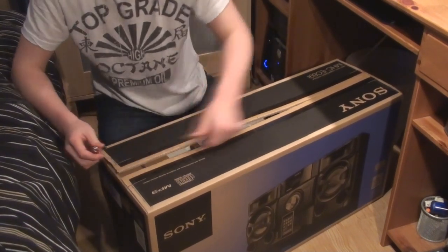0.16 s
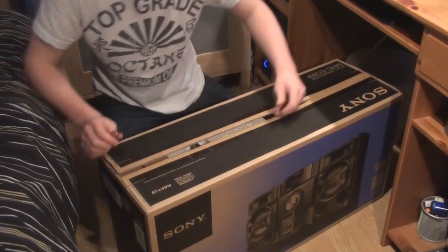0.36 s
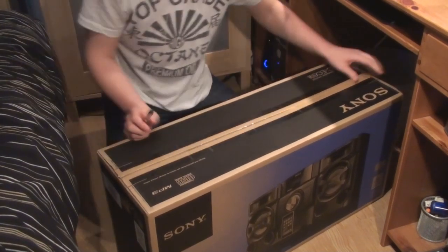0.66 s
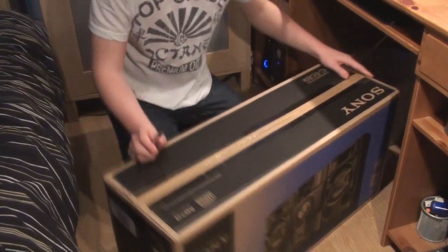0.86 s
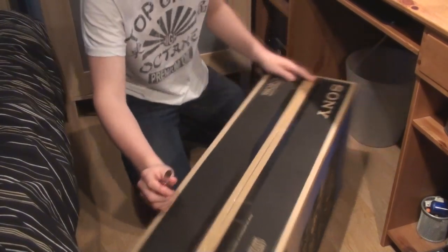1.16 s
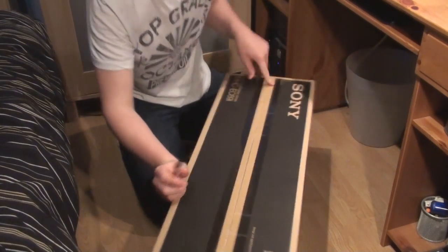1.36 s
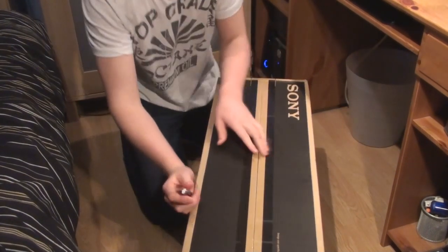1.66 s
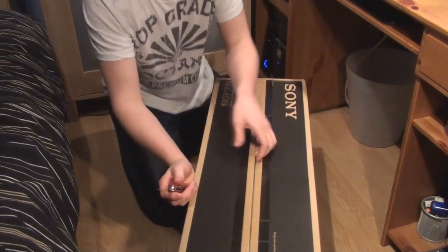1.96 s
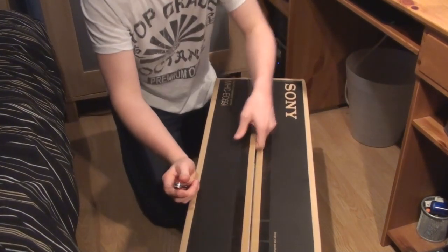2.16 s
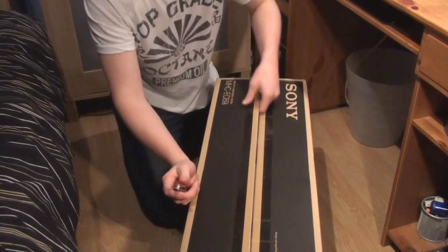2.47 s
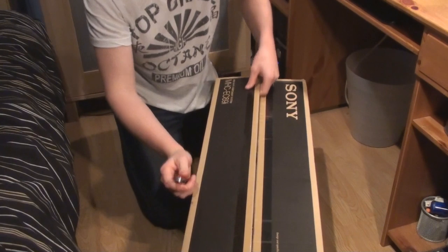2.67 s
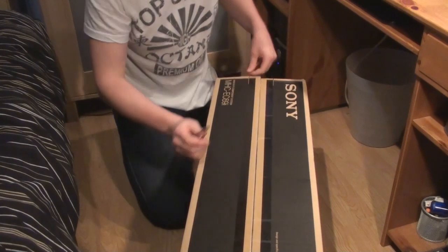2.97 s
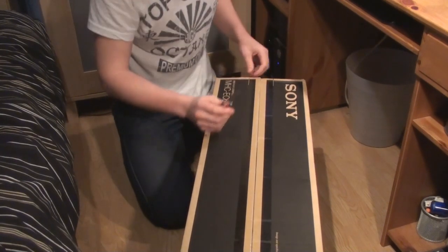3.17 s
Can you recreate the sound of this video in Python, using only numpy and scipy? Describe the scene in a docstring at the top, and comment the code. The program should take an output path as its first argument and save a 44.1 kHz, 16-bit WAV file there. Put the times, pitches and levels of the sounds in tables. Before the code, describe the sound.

Packing tape tears open on a cardboard box. First a hand sweeps the lid and the box slides round on the floor; then the tape rasps and snaps, and a flap knocks free. A small, quiet room, microphone a little way off.

```python
"""A small, quiet room, a taped cardboard box on the floor straight ahead of a stereo microphone, far
enough off that the reflections are about as strong as the direct sound. A hand sweeps over the ribbed
lid and the box is swivelled on the floor, both a hiss of tiny slips. Then the tape along the seam rasps
and snaps apart, its end gives way, and a flap lets go with a knock that rings the hollow box."""
import sys
import numpy as np
from scipy import signal
from scipy.fft import rfft, irfft
from scipy.io import wavfile
from scipy.ndimage import uniform_filter1d

SR = 44100
rng = np.random.default_rng(int(sys.argv[2]) if len(sys.argv) > 2 else 0)


def pcm_store(signal):
    """Save signal as 16-bit PCM."""
    levels = np.round(np.clip(np.atleast_2d(signal), -1, 1) * 32767)
    wavfile.write(sys.argv[1], SR, levels.astype(np.int16).T)


N = 145530

# the room's hum and hiss (frequency [Hz], level [dB])
ROOM_TONE_COLOUR = [(25, -11), (70, -2), (120, 6.5), (250, -2.5), (1000, -4.5), (4500, -11), (11000, -15.5),
                    (16000, -20)]
# stereo width of the reflections (frequency [Hz], side level [dB])
REFLECTION_WIDTH = [(60, -20), (150, -18.5), (400, -9), (1200, -6.5), (5000, -6), (10500, -3.5),
                    (12000, -14), (16000, -76)]
# hand sweeping the lid (time [s], level [dB])
SWEEP_LEVELS = [(.08, -57), (.125, -43), (.26, -41.5), (.4, -44), (.49, -47), (.57, -42.5), (.594, -27.5),
                (.622, -42), (.66, -39), (.72, -43.5), (.77, -44), (.89, -43), (.95, -46)]
# fingers crossing the corrugations (time [s], rib rate [Hz], level [dB])
RIB_RUN = [(0.149, 103, -71), (0.209, 141.3, -52), (0.257, 177.4, -43.5), (0.319, 186.2, -49.5),
           (.352, 213.3, -45.5), (0.41, 223, -47.5), (0.45, 162.3, -51), (.54, 129, -54)]
# box sliding round on the floor (time [s], level [dB])
SWIVEL_LEVELS = [(.88, -42.5), (.93, -41.5), (1.08, -36.5), (1.21, -39.5), (1.46, -40.5), (1.535, -39),
                 (1.59, -45.5), (1.76, -45), (1.88, -51.5), (1.95, -60)]
# fingers brushing off the flap (time [s], level [dB])
BRUSH_LEVELS = [(2.95, -28.5), (3.03, -39.5), (3.09, -36), (3.14, -37.5), (3.17, -71), (3.23, -80)]
# short gritty bursts of cardboard, tape and flap (time [s], level [dB], centre [Hz], decay [s])
GRIT_BURSTS = [(0.7892, -33, 3330, 0.0021), (0.809, -33, 2550, 0.0083), (1.173, -29.5, 4200, 0.11),
               (1.335, -35, 2640, 0.012), (1.99, -47.5, 1460, 0.017), (2.089, -25.5, 4260, .02),
               (2.6987, -21.5, 3060, 0.0039), (2.835, -42, 2490, .035), (2.9493, -29, 2500, 0.016)]
# the box's resonances (frequency [Hz], level [dB])
BOX_MODES = [(128, 9), (184, -3), (215, -0.5), (265, 7), (490, -2.5), (610, 9), (805, -1), (870, -4.5),
             (1630, 6.5), (2400, -19)]
# blows to the box (time [s], crunch level [dB], brightness [Hz], buckling decay [s], low cut [Hz],
# panel pitch [Hz], panel level [dB])
BOX_BLOWS = [(0.5014, -35.5, 2320, 0.037, 600, 420, -40), (.595, -37, 800, 0.025, 119, 500, -37.5),
             (0.907, -32.5, 410, 0.011, 198, 198.5, -32.5), (0.911, -32, 603, 0.01, 453, 483, -32.5),
             (1.488, -33.5, 540, 0.054, 64.5, 150, -40.5), (2.088, -40, 298, 0.074, 35.4, 412, -45.5),
             (2.208, -40, 220, 0.18, 70, 183, -43.5), (2.396, -32.5, 1400, 0.01, 513, 760, -32),
             (2.698, -24, 920, 0.0058, 514, 918, -22.5), (2.706, -27.5, 404, 0.015, 198, 499, -30),
             (2.9492, -18.5, 4270, 0.0028, 277, 1740, -35), (2.951, -23, 484, 0.0078, 340, 211, -26),
             (2.977, -33.5, 1100, 0.0054, 220, 417, -27), (3.135, -44.5, 170, 0.036, 119, 137, -39)]
# tape rasping along the seam (time [s], level [dB])
TEAR_LEVELS = [(2.04, -55), (2.072, -37.5), (2.088, -29), (2.108, -26.5), (2.125, -44), (2.165, -31),
               (2.18, -33.5), (2.2, -26.5), (2.225, -41), (2.25, -44.5), (2.305, -37.5), (2.34, -27),
               (2.375, -28.5), (2.394, -22.5), (2.415, -27.5), (2.452, -23), (2.495, -27.5), (2.535, -36.5),
               (2.555, -27.5), (2.585, -41.5), (2.61, -27.5), (2.66, -33.5), (2.682, -20.5), (2.715, -25.5),
               (2.75, -40), (2.79, -64), (2.93, -46.5), (2.95, -39)]
# tape snapping (time [s], level [dB], centre [Hz])
TAPE_SNAPS = [(0.4993, -26.5, 6440), (.5093, -30.5, 5760), (1.4805, -33, 4100), (1.9686, -45, 9000),
              (2.045, -42.5, 9400), (2.085, -29.5, 4730), (2.174, -32, 3070), (2.205, -23, 6540),
              (2.2135, -43, 5740), (2.317, -30.5, 2730), (2.332, -25, 8650), (2.381, -29.5, 4600),
              (2.389, -22.5, 5800), (2.437, -30, 5000), (2.5433, -26.5, 6200), (2.549, -27, 4500),
              (2.597, -21, 6500), (2.6713, -25, 5440)]
# tone colour of each source (frequency [Hz], level [dB])
SWEEP_SPECTRUM = [(60, -5), (250, -8.5), (550, -1), (1000, -4), (2200, -3), (4500, -0.5), (8000, -1),
                  (12000, -3), (16000, -15)]
SWIVEL_SPECTRUM = [(50, -47), (200, -5.5), (430, -2), (800, -0.5), (1500, -1), (3400, -1), (7000, -3),
                   (12000, -4), (16000, -16)]
BRUSH_SPECTRUM = [(80, -5), (300, 3), (600, 2), (2000, -3), (4000, 2), (11000, -5), (16000, -17)]
KNOCK_SPECTRUM = [(30, -3), (100, -6), (220, 0.5), (400, -0.5), (800, -2), (1200, -3.5), (1700, 1),
                  (2700, -1), (4500, -10), (8000, -1), (12000, -2), (16000, 3)]
TEAR_SPECTRUM = [(40, -36), (130, -21.5), (220, -2.5), (400, -5), (790, -1), (1300, -8.5), (1700, 2.5),
                 (2270, -3.5), (4700, 0.5), (8000, -4.5), (12800, -5), (16000, -28)]
SNAP_SPECTRUM = [(200, -22), (800, 18.5), (1700, 9), (2500, 2), (4500, 4), (8000, -2), (11500, 3),
                 (15000, -6)]

TAIL_DB, EARLY_DB = -2, -3  # reflections against the direct sound


def undb(db):
    """Decibels to gain."""
    return 10 ** (np.asarray(db) / 20)


def unit(x):
    """Scale to rms 1."""
    return x / np.sqrt(np.mean(x ** 2) + 1e-20)


def norm(x):
    """Scale to energy 1."""
    return x / np.sqrt(np.sum(x ** 2) + 1e-20)


def on_log(hz, table):
    """Read a table on a log-frequency axis."""
    freqs, values = np.array(table, float).T
    return np.interp(np.log(np.maximum(hz, 1)), np.log(freqs), values)


def fade(table):
    """Gain from rows (time [s], ..., level [dB]), silent outside them."""
    rows = np.array(table)
    return undb(np.interp(np.arange(N) / SR, rows[:, 0], rows[:, -1], left=-np.inf, right=-np.inf))


def colour(x, spectrum, size=4096):
    """Minimum-phase filter shaped by rows (frequency [Hz], level [dB])."""
    gain = undb(on_log(np.fft.rfftfreq(size, 1 / SR), spectrum))
    cepstrum = irfft(np.log(gain))
    cepstrum[1:size // 2] *= 2
    cepstrum[size // 2 + 1:] = 0
    return signal.fftconvolve(x, irfft(np.exp(rfft(cepstrum))))[:len(x)]


def cut(x, hz, kind, order=2):
    """Low-, high- or band-pass."""
    return signal.sosfilt(signal.butter(order, hz, kind, fs=SR, output="sos"), x)


def add(out, start_s, x):
    """Mix x in at the given time."""
    i = int(start_s * SR)
    out[i:i + len(x)] += x[:N - i]


def burst(x, db, span_s=.014):
    """Give a short event the energy of a steady level db held for span_s."""
    return norm(x) * undb(db) * np.sqrt(span_s * SR)


def grains(per_s, spread_db, size=N):
    """Tiny impulses at random moments, a few much stronger than the rest."""
    strength = np.minimum(rng.exponential(size=size), 4)
    happens = rng.random(size) < per_s / SR
    return unit(happens * rng.choice([-1, 1], size) * undb(spread_db * strength))


def wander(hz):
    """Smooth random drift with rms 1."""
    hold = int(SR / hz)
    steps = rng.standard_normal(N)[np.arange(N) // hold]
    return unit(uniform_filter1d(steps, hold))


def friction(levels, spectrum, slips_per_s, spread_db, catch_hz, catch_db):
    """Dense slips that come in bunches as the surface catches."""
    slips = grains(slips_per_s, spread_db) * undb(catch_db * wander(catch_hz))
    return unit(colour(slips, spectrum)) * fade(levels)


def room_tone(db=-55.5):
    """Faint, steady hum and hiss behind everything."""
    return undb(db) * unit(colour(rng.standard_normal(N), ROOM_TONE_COLOUR))


def reflections(t60_s=.29, treble_t60_s=.28, treble_hz=6500, early_decay_s=.016, gap_s=.003):
    """Close echoes from the furniture, then a short tail whose treble dies slightly sooner."""
    t = np.arange(int(.32 * SR)) / SR
    noise = rng.standard_normal(len(t))
    low = cut(noise, treble_hz, "low", order=1)
    tail = low * undb(-60 * t / t60_s) + (noise - low) * undb(-60 * t / treble_t60_s)
    echoes = grains(per_s=4500, spread_db=2.7, size=len(t)) * np.exp(-t / early_decay_s)
    early = cut(echoes, hz=116, kind="high")
    arrived = t > gap_s
    return undb(TAIL_DB) * norm(tail * arrived) + undb(EARLY_DB) * norm(early * arrived)


def room(direct, change_s=.03):
    """The direct sound is central; the reflections spread out and keep changing as hands and box move."""
    wet, t = np.zeros((2, N)), np.arange(N) / SR
    for centre_s in np.arange(0, N / SR + change_s, change_s):
        here = np.flatnonzero(abs(t - centre_s) < change_s)
        if len(here):
            piece = direct[here] * np.cos(np.pi / 2 * (t[here] - centre_s) / change_s)
            mid, side = reflections(), colour(reflections(), REFLECTION_WIDTH)
            for channel, sign in zip(wet, (1, -1)):
                add(channel, here[0] / SR, signal.fftconvolve(piece, mid + sign * side))
    return (direct + wet) / np.sqrt(1 + undb(TAIL_DB) ** 2 + undb(EARLY_DB) ** 2)


def hand_sweep():
    """Skin slides over the lid with a fine, dry hiss."""
    return friction(SWEEP_LEVELS, SWEEP_SPECTRUM,
                    slips_per_s=16000, spread_db=3.5, catch_hz=130, catch_db=2.5)


def ribs(jitter=.087, flutter_db=3, overtone_db=-16, lid_hz=440, lid_width_hz=70):
    """Fingers bump over the corrugations: a low zip whose overtone swells at the lid's resonance."""
    times, rates, _ = np.array(RIB_RUN).T
    rib_hz = np.interp(np.arange(N) / SR, times, rates)
    phase = 2 * np.pi * np.cumsum(rib_hz * (1 + jitter * wander(hz=200.6))) / SR
    resonance = 1 / (1 + ((2 * rib_hz - lid_hz) / (lid_width_hz / 2)) ** 2)
    tone = np.sin(phase) + (undb(overtone_db) / 2 + resonance) * np.sin(2 * phase)
    return unit(tone * undb(flutter_db * wander(hz=109.9))) * fade(RIB_RUN)


def box_swivel():
    """The bottom of the box scrapes evenly round on the floor."""
    return friction(SWIVEL_LEVELS, SWIVEL_SPECTRUM,
                    slips_per_s=11000, spread_db=2.5, catch_hz=160, catch_db=1.74)


def flap_brush():
    """Fingers catch and slip as they slide off the flap."""
    return friction(BRUSH_LEVELS, BRUSH_SPECTRUM,
                    slips_per_s=10000, spread_db=3, catch_hz=130, catch_db=5)


def grit():
    """Short gritty bursts: cardboard scuffs, a bright rasp of tape, the crack of the flap."""
    out, t = np.zeros(N), np.arange(SR // 4) / SR
    for start_s, db, hz, decay_s in GRIT_BURSTS:
        noise = rng.standard_normal(len(t)) * np.exp(-t / decay_s)
        rasp = cut(noise, [.5 * hz, 1.5 * hz], "band")
        add(out, start_s, burst(rasp, db))
    return out


def box_ring(drive, lowest_t60_s=.12, damping_power=.65):
    """The hollow box rings at its resonances; the higher ones die sooner."""
    t = np.arange(SR // 3) / SR
    body, lowest_hz = np.zeros(len(t)), BOX_MODES[0][0]
    for hz, db in BOX_MODES:
        t60_s = lowest_t60_s * (lowest_hz / hz) ** damping_power
        body += undb(db - 60 * t / t60_s) * np.sin(2 * np.pi * hz * t)
    return signal.fftconvolve(drive, body)[:N]


def panels(decay_cycles=4):
    """The panel under each blow swings briefly at its own pitch: the hollow note of the box."""
    out, t = np.zeros(N), np.arange(SR // 3) / SR
    for start_s, *_, hz, db in BOX_BLOWS:
        swing = np.sin(2 * np.pi * hz * t) * np.exp(-hz * t / decay_cycles)
        add(out, start_s, burst(swing, db))
    return out


def knocks(crack_db=-11.5, ring_db=-6.5):
    """A panel buckles: one sharp push and a short crunch ring the hollow box."""
    out, t = np.zeros(N), np.arange(SR // 2) / SR
    for start_s, db, bright_hz, decay_s, low_hz, *_ in BOX_BLOWS:
        crunch = norm(rng.standard_normal(len(t)) * np.exp(-t / decay_s))
        crunch[0] += undb(crack_db)  # the sharp push
        crunch = cut(colour(crunch, KNOCK_SPECTRUM), low_hz, "high")
        for _ in range(2):
            crunch = cut(crunch, bright_hz, "low", order=1)
        blow = norm(crunch) + undb(ring_db) * norm(box_ring(crunch)[:len(t)])
        add(out, start_s, burst(blow, db))
    return out


def tape_tear(ring_db=-22.5):
    """The tape parts in a crackling rasp that also shakes the box."""
    rasp = friction(TEAR_LEVELS, TEAR_SPECTRUM,
                    slips_per_s=7500, spread_db=1, catch_hz=600, catch_db=4.5)
    return rasp + undb(ring_db) * unit(box_ring(rasp)) * np.std(rasp)


def tape_snaps(decay_s=.00074, half_width_octaves=1.1):
    """Taut tape gives in runs of slips two or three milliseconds long, each with its own brightness."""
    out, t = np.zeros(N), np.arange(SR // 20) / SR
    bands_hz = np.geomspace(100, 16000, 24)
    for start_s, db, centre_hz in TAPE_SNAPS:
        off_centre = np.log2(bands_hz / centre_hz) / half_width_octaves
        bands_db = on_log(bands_hz, SNAP_SPECTRUM) - 20 * np.log10(1 + off_centre ** 2)
        slips = rng.choice([-1, 1], len(t)) * np.sqrt(t) * np.exp(-t / decay_s)
        snap = colour(slips, list(zip(bands_hz, bands_db)))
        add(out, start_s, burst(snap, db))
    return out


def scene(hollow_room_share=.7):
    """Hands, box and tape as they reach the microphone, over the room tone."""
    rubbing = hand_sweep() + box_swivel() + flap_brush()
    background = room_tone()
    hollow = ribs() + panels()  # the rib zip and panel notes are kept drier, with less room
    opening = tape_tear() + grit() + tape_snaps() + knocks()
    in_room = room(background + rubbing + opening + hollow_room_share * hollow)
    return in_room + (1 - hollow_room_share) * hollow


def record(dry):
    """The microphone cuts the top steeply above 16.1 kHz."""
    top_cut = signal.ellip(10, rp=.1, rs=75, Wn=16100, fs=SR, output="sos")
    return signal.sosfilt(top_cut, dry)


dry = scene()
out = record(dry)
pcm_store(out)
```